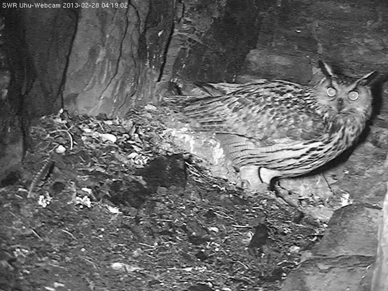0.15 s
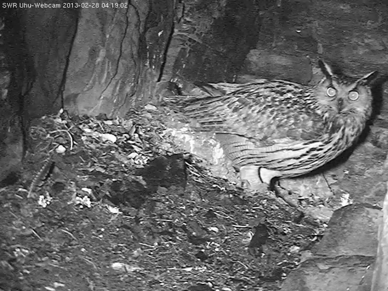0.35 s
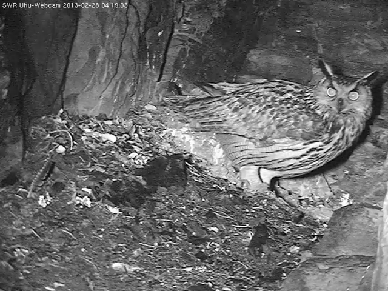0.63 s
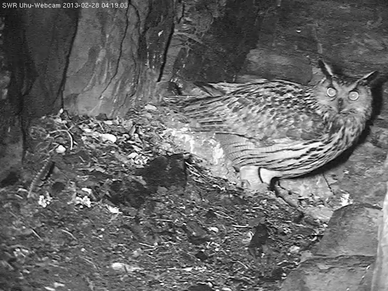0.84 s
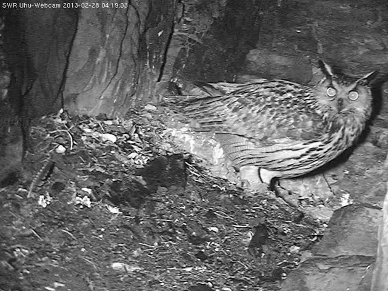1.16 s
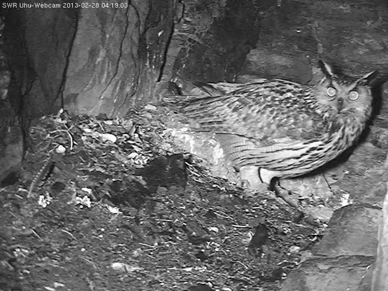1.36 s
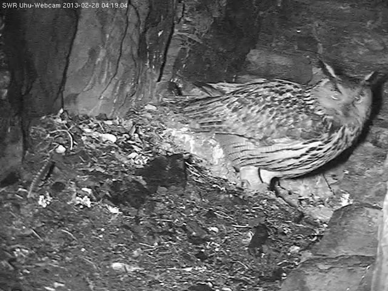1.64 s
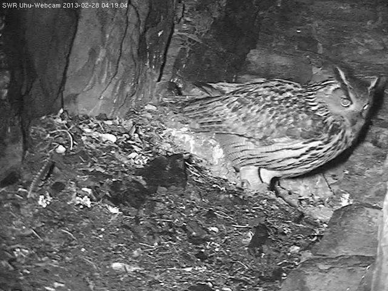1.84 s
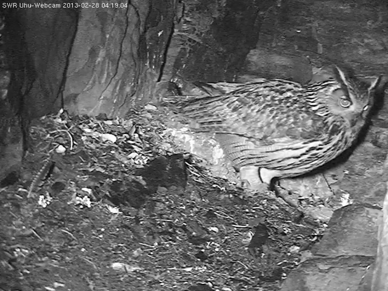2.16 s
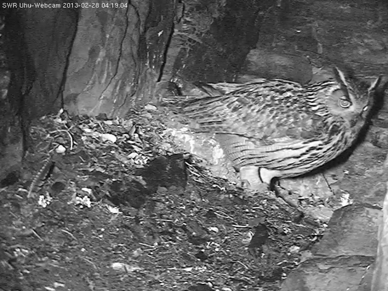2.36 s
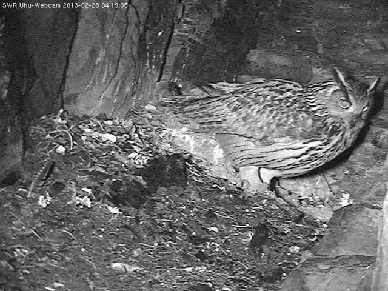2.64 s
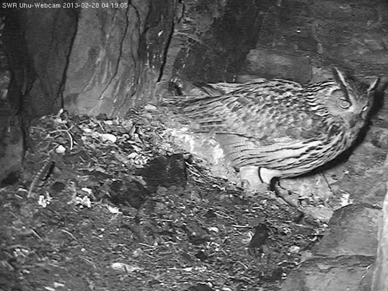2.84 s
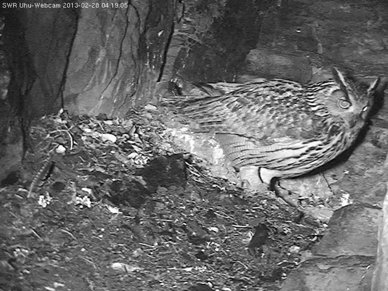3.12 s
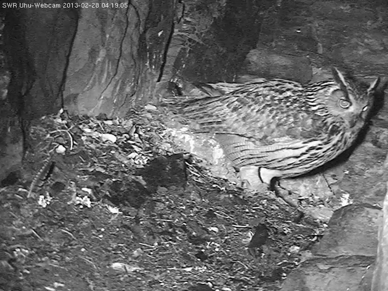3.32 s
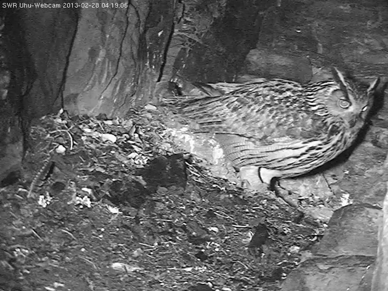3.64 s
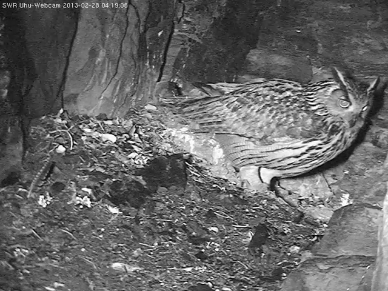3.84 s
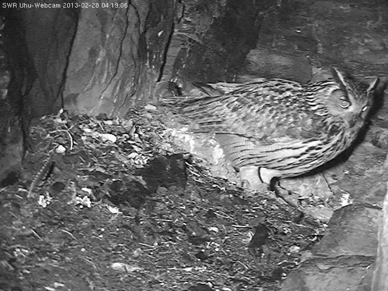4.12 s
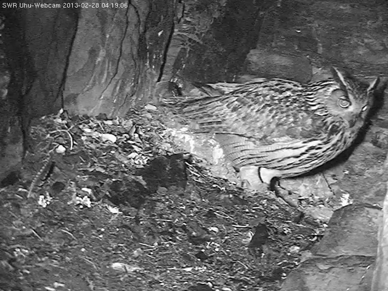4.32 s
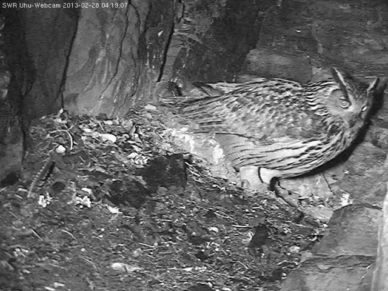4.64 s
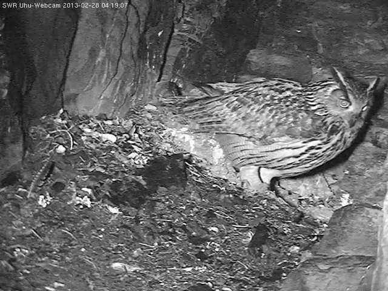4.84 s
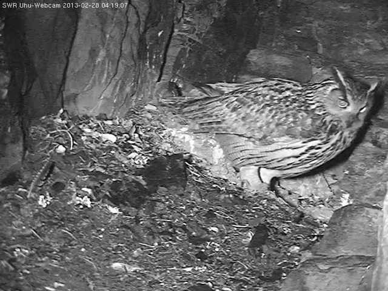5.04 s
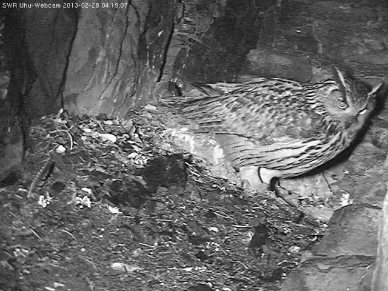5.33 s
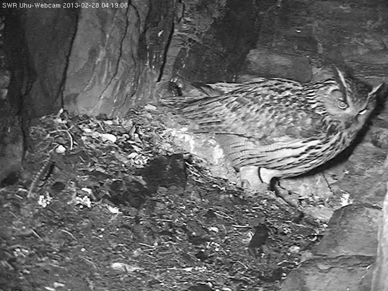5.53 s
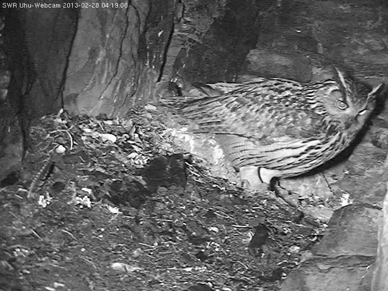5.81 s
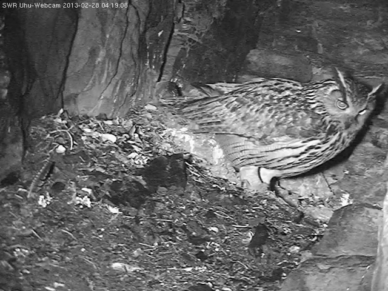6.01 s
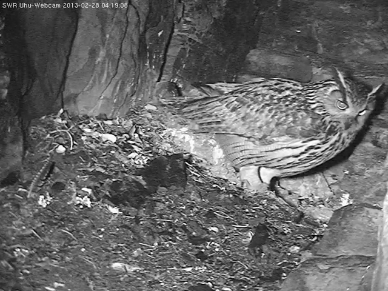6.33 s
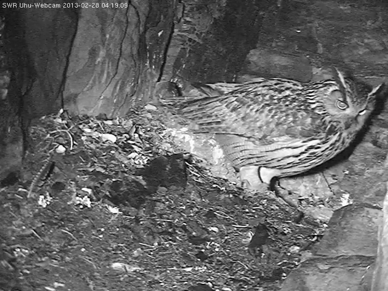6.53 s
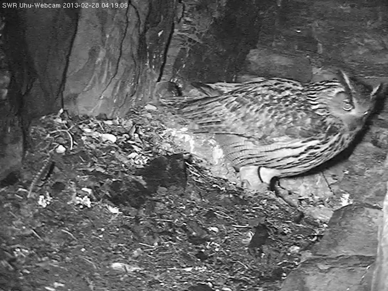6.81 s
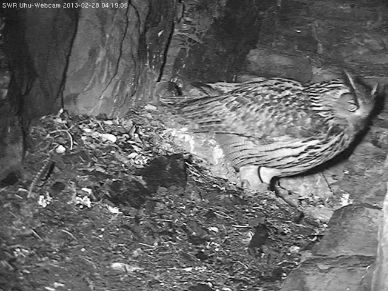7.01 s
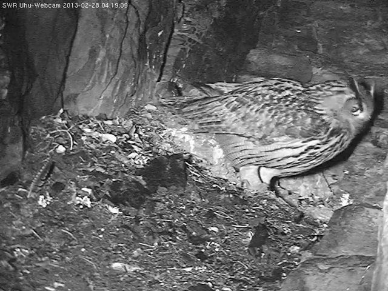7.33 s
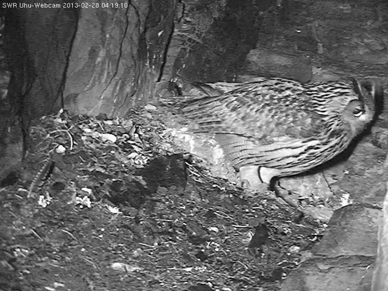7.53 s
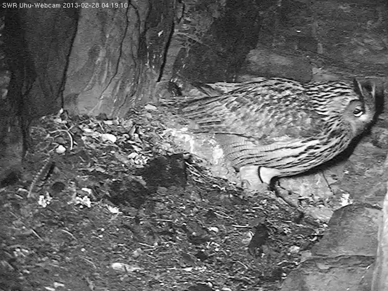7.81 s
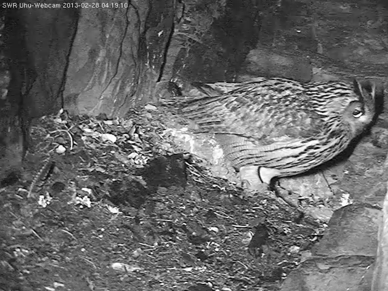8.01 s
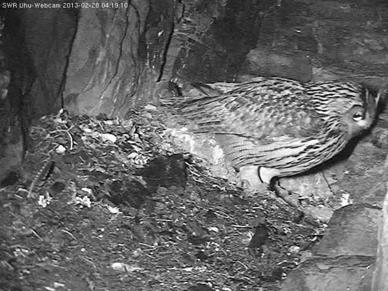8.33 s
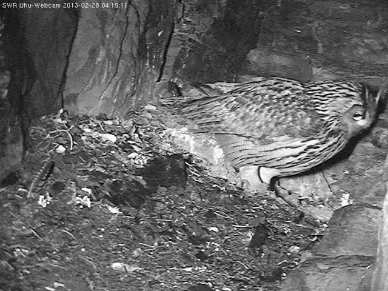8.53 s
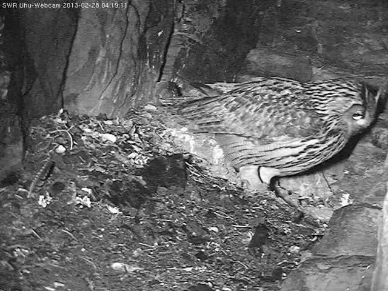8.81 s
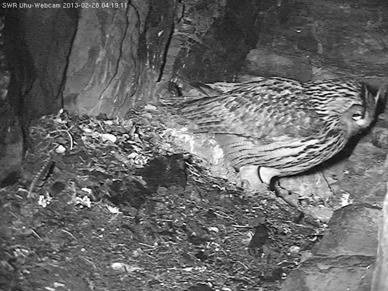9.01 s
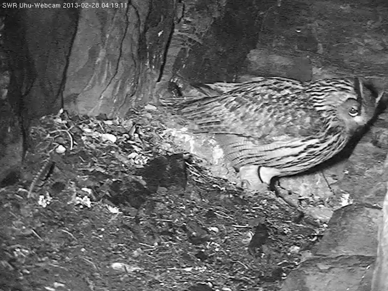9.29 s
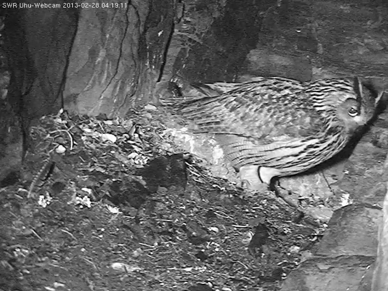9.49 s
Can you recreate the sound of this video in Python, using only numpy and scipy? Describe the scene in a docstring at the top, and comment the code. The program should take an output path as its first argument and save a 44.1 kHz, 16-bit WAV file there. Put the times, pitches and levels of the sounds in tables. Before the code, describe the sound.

An eagle owl close by gives clipped, hoarse barks twice a second, each trailed by thin whiny wheezes and low creaky grunts, over faint night hush.

```python
"""On a rock ledge at night, an eagle owl chatters close to a nest microphone.
A typical bout is a clipped bark that ends in a hiss, then a thin whine and one or two lower, creaky grunts.
The voice is a source and a filter: syrinx pulses excite throat resonances, with a faint noisy buzz on them.
Shaped noise makes the hisses, wheezes and squeaks; gliding sines make the whine, a steady sine a soft hum.
Behind them lie a faint night rush, a drone and mains hum; the rock niche adds a brief echo tail."""
import sys
import numpy as np
from scipy import signal
from scipy.fft import rfft, irfft, next_fast_len
from scipy.io import wavfile
from scipy.ndimage import uniform_filter1d, map_coordinates

SR = 44100
rng = np.random.default_rng(int(sys.argv[2]) if len(sys.argv) > 2 else 0)


def generate_wav(signal):
    """Clip the signal to [-1, 1] and save it as 16-bit WAV at the path in sys.argv[1]."""
    frames = np.transpose(np.atleast_2d(signal))
    scaled = np.clip(frames, -1, 1) * 32767
    pcm = np.round(scaled).astype(np.int16)
    wavfile.write(sys.argv[1], SR, pcm)


N = 426006

# All levels in the tables are relative: the gains set below and in scene() add to them.

# spectrum of the still night: centre_hz, gain_db
NIGHT_SPECTRUM = [(30, -2.5), (70, 5), (110, -2.5), (180, 4.5), (230, 3), (400, 7.5), (720, 2), (1100, 3.5),
                  (1500, -3), (3050, -6.5), (3600, -15), (7200, -15.5), (8500, -32)]
# narrow bands that drone in the background: centre_hz, width_hz, gain_db
DRONE_BANDS = [(148, 6.4, -5), (464, 24, -11), (980, 41, -23.5), (1835, 25, -23)]
# reverberation of the rock niche: centre_hz, t60_s
NICHE_DECAY = [(150, 0.15), (1000, 0.088), (6000, 0.017)]
# throat resonances: centre_hz, width_hz, gain_db
THROAT_MODES = [(146, 103.4, 35), (285, 160, 13), (435.6, 122, 24.3), (830, 240, 21), (1190, 850, 27.5)]
# whistling resonances of the bill: centre_hz, width_hz, gain_db
BILL_MODES = [(2300, 170, -5), (2950, 400, -10), (3470, 170, 0)]
# spectrum of air rushing through the mouth: centre_hz, gain_db
MOUTH_SPECTRUM = [(150, -22), (420, -14), (620, 0.5), (850, 4.5), (1080, 0.5), (1350, -15.5), (1800, -9),
                  (2050, -12), (2400, -7.5), (2750, -14.5), (3800, -15.5), (4400, -13), (7200, -25),
                  (8500, -46)]
# spectrum of the buzz on the pulses: centre_hz, gain_db
BUZZ_SPECTRUM = [(600, -23), (1300, -9), (1680, 0), (2000, -12), (2330, 1), (2700, -10), (3400, -11.5),
                 (3800, -17), (5200, -11), (6000, -21.5), (7400, -19), (8500, -41.5)]
# partials of the whine, in harmonic order: multiple, level_db
WHINE_PARTIALS = [(1, 1), (2, 1), (3, -17), (4, -17), (5, -24.5)]
# barks: start_s, length_s, top_pitch_hz, pulse_db, hiss_db
BARKS = [(0.6317, 0.027, 172.4, -26, -84), (1.0725, 0.0276, 252, -21, -58),
         (1.5195, 0.034, 268.6, -19.5, -50.5), (1.9289, 0.037, 272.6, -18.5, -49.5),
         (2.455, 0.0188, 211, -19, -52), (2.947, 0.031, 275, -19, -49.5), (3.4161, 0.035, 288, -19, -47),
         (3.9815, 0.026, 264.5, -18.5, -53), (4.5653, 0.029, 257.5, -18, -52),
         (5.0996, 0.038, 265, -18, -54.5), (5.6012, 0.0445, 271, -18, -50), (6.0947, 0.03, 269, -17, -51.5),
         (7.816, 0.032, 272.5, -16.5, -47.5), (8.3128, 0.04, 281.4, -17.5, -47.5),
         (8.8396, 0.033, 277, -17.5, -49), (9.375, 0.027, 253, -17, -50)]
# grunts: start_s, length_s, first_pitch_hz, last_pitch_hz, pulse_db
GRUNTS = [(0.731, .06, 178.5, 118, -27), (1.2046, .015, 168, 108.5, -27.5), (1.668, .014, 167, 110, -26.5),
          (2.0717, .021, 219, 231.5, -21), (2.132, .0653, 215.2, 105.8, -22.5),
          (3.0826, .094, 221, 119.5, -24), (3.56, .017, 205, 145, -24), (3.606, .053, 207, 107.6, -24.5),
          (4.1316, .044, 151.6, 114, -26.5), (4.6992, .011, 189, 175, -24), (5.232, .037, 198, 167, -23),
          (5.741, .02, 208.5, 162, -23.5), (5.825, .029, 166.4, 112, -23.5), (6.232, .024, 227, 211, -21),
          (6.3131, .032, 185.5, 122.4, -23), (6.835, .023, 226, 199, -21), (6.9407, 0.033, 175, 108, -23),
          (7.4453, .0184, 202, 216, -21.5), (7.5539, 0.031, 176.4, 122.6, -22),
          (7.9684, .0071, 140, 135, -29), (8.035, .041, 181, 111, -22.5),
          (8.5373, .022, 158.3, 113.8, -21.5), (8.98, 0.029, 215, 229.4, -20),
          (9.0803, .016, 138.6, 110, -23), (9.516, .007, 140, 140, -32.5), (9.6162, .0082, 122, 118, -24)]
# wheezes between the syllables, a rasp with a whine at its end: start_s, length_s, rasp_db, whine_db
WHEEZES = [(0.678, 0.037, -71, -54), (1.15, 0.058, -77, -63), (1.628, 0.025, -62.5, -62),
           (2.043, 0.034, -65, -47.5), (2.095, 0.029, -59, -46.5), (2.52, 0.063, -58.5, -52),
           (2.596, 0.047, -60.5, -54), (3.052, 0.028, -65.5, -52), (3.525, 0.033, -65, -50),
           (4.63, 0.065, -59, -52), (4.72, 0.044, -63.5, -52.5), (5.177, 0.047, -63.5, -54),
           (5.272, .05, -66.5, -56.5), (5.715, .028, -65.5, -57), (5.769, 0.041, -59, -53),
           (6.207, 0.038, -67, -60), (6.256, .05, -57, -50), (6.808, 0.028, -62, -50),
           (6.857, 0.075, -55.5, -53), (7.398, .047, -62, -49.5), (7.469, 0.076, -58.5, -50.5),
           (7.912, .053, -65.5, -47), (7.98, 0.045, -58, -48.5), (8.394, 0.06, -59.5, -49.5),
           (8.466, 0.06, -59, -50), (8.948, 0.032, -66, -47), (9.016, .048, -59, -52.5),
           (9.439, 0.068, -58, -52), (9.529, 0.067, -59.5, -50)]
# voiceless barks, a swelling squeak: start_s, length_s, level_db
SQUEALS = [(6.721, 0.031, -51), (7.325, 0.035, -51)]
# one soft hum through the closed bill: start_s, length_s, pitch_hz, level_db
MURMUR = (2.667, .016, 150, -50)

# a bark starts slack, then breaks into its high register, climbs to the top and sags
SLACK_HZ, SLACK_END_HZ, BREAK_S, BREAK_GLIDE_S = 159.7, 213, 0.0102, 0.0004
# pitch after the break and at the end (shares of the top pitch); place of the top (share of the length)
BREAK_SHARE, SAG_SHARE, TOP_AT = 0.94, 0.893, 0.72
BARK_ONSET_DB, BARK_ATTACK_S, BARK_END_DB = -7.5, 0.022, -3.5
# the hiss starts after the break and outlasts the voice
HISS_DELAY_S, HISS_OVERHANG_S, HISS_FADE_DB = 0.018, 0.027, -6.5

# the higher a grunt starts, the more its pitch bulges in the middle
ARCH_PER_HZ, ARCH_FROM_HZ = 0.003, 162
GRUNT_FIRST_DB, GRUNT_LAST_DB = -0.5, -1.5  # level at a grunt's start and end
# air under a grunt whose mean pitch is GRUNT_HZ, relative to its pulses; higher grunts leak more
GRUNT_AIR_DB, AIR_DB_PER_OCTAVE, GRUNT_HZ = -39, 13.5, 190

# the whine fills the end of a wheeze: it scoops up, then sinks
WHINE_S, SCOOP_HZ, WHINE_HZ, WHINE_END_HZ = 0.022, 372, 543, 451.5
WHEEZE_FADE_DB, SQUEAL_SWELL_DB = -3, 7  # change of level over the length
WHEEZE_DULL_HZ = 6000  # corner above which the wheezes lose treble

FLUTTER_DB, RATTLE_DB = 2.4, -2  # unevenness of the rushing air; rattle against its noise
HISS_DB, WHEEZE_DB, SQUEAL_HISS_DB, SQUEAK_DB = 16.5, 18, -1.5, 2
BUZZ_RASP, BUZZ_DB = 0.6, 52.5  # noise share of the buzz; its gain
BUZZ_REST_DB = -66  # the edge that remains without airflow
NIGHT_DB = -59.5  # rms of the rush before its slow drift
TOP_HZ = 8600  # band limit of the microphone


def amp(db):
    """Amplitude ratio of a level: twenty decibels per factor of ten."""
    return 10 ** (np.asarray(db) / 20)


def unit(x):
    """Normalisation to an rms of 1."""
    return x / np.sqrt(np.mean(x ** 2) + 1e-20)


def along(points, hz):
    """Linear interpolation of (frequency, value) points on a logarithmic frequency axis."""
    f, v = np.transpose(points)
    return np.interp(np.log(hz + 1), np.log(f + 1), v)


def wobble(rate):
    """Slow random modulation: a smooth curve through rate random knots a second."""
    knots = rng.standard_normal(int(N * rate / SR) + 4)
    return map_coordinates(knots, [np.arange(N) * rate / SR])


def filtered(x, response):
    """Linear filtering: the spectrum of x times a response of frequency."""
    m = next_fast_len(N + SR // 2)
    return irfft(rfft(x, m) * response(np.fft.rfftfreq(m, 1 / SR)), m)[:N]


def resonances(modes, f):
    """Superposition of damped resonators, each a causal (centre, width, gain) band-pass."""
    return sum(amp(db) * 1j * f * w / (hz * hz - f * f + 1j * f * w) for hz, w, db in modes)


def gate(t, start, end, edge):
    """Amplitude window that opens at start and shuts at end, softly over edge seconds."""
    return (np.tanh((t - start) / edge) - np.tanh((t - end) / edge)) / 2


def add(out, times, sizes):
    """Band-limited impulses: windowed sincs place pulses between the samples."""
    taps = (times * SR).astype(int)[:, None] + np.arange(-8, 9)
    shape = np.sinc(taps - times[:, None] * SR) * np.hanning(taps.shape[1])
    np.add.at(out, np.clip(taps, 0, N - 1), sizes[:, None] * shape)


def airflow(rows, fade_db, edge):
    """Flow envelope: (start, length, dB) puffs whose level slides by fade_db over their length."""
    gain = np.zeros(N)
    for start, length, db in rows:
        first = max(int(start * SR) - SR // 20, 0)
        last = min(int((start + length) * SR) + SR // 20, N)
        i = np.arange(first, last)
        slide = fade_db * (np.clip((i / SR - start) / length, 0, 1) - 0.5)
        gain[i] += amp(db + slide) * gate(i / SR, start, start + length, edge)
    return gain


def night(drone_db, hum_db):
    """Stationary background: a nearly even shaped-noise rush, noise in narrow bands and a mains sine."""
    rush = unit(filtered(rng.standard_normal(N), lambda f: amp(along(NIGHT_SPECTRUM, f))))
    drone = unit(filtered(rng.standard_normal(N), lambda f: resonances(DRONE_BANDS, f)))
    hum = unit(np.sin(2 * np.pi * 50 * np.arange(N) / SR))
    return amp(NIGHT_DB + 0.16 * wobble(3.4)) * rush + amp(drone_db) * drone + amp(hum_db) * hum


def niche(x):
    """Reverberation: decaying noise stands for the rock walls' echoes, the treble dying first."""
    hz, t, z = signal.stft(rng.standard_normal(SR // 3), SR, nperseg=256)
    decay = amp(-60 * t / along(NICHE_DECAY, hz)[:, None])
    tail = signal.istft(z * decay, SR, nperseg=256)[1]
    return signal.fftconvolve(x, tail / np.linalg.norm(tail))[:N]


def murmur():
    """Low-pass radiation: a grunt behind the closed bill lets out only its fundamental, a sine."""
    s, length, hz, db = MURMUR
    t = np.arange(N) / SR
    return amp(db) * gate(t, s, s + length, edge=0.0035) * np.sin(2 * np.pi * hz * (t - s))


def rattle(rate_hz, uneven, scatter_db):
    """Irregular flapping: membranes that do not quite close make sharp ticks of scattered size."""
    gaps, sizes = rng.standard_normal((6000, 2)).T
    ticks = np.zeros(N)
    times = np.cumsum(np.exp(uneven * gaps) / rate_hz)
    inside = times < N / SR
    add(ticks, times[inside], amp(scatter_db * np.clip(sizes[inside], -2, 2)))
    return ticks


def squeak(ticks, rattle_db):
    """Resonance driven by noise: a hard push of voiceless air rattles and whistles in the bill."""
    drive = rng.standard_normal(N) + amp(rattle_db) * unit(ticks)
    whistle = filtered(drive, lambda f: resonances(BILL_MODES, f) * amp(along(MOUTH_SPECTRUM, f)) ** 0.5)
    return airflow(SQUEALS, fade_db=SQUEAL_SWELL_DB, edge=0.0048) * unit(whistle)


def whine(waver, flutter_db, scoop_s, lead_db, level_db):
    """Weak oscillation: tense membranes scoop up to a thin, unsteady harmonic tone that sinks in pitch."""
    out = np.zeros(N)
    drift = 1 + waver * wobble(160)
    flutter = amp(flutter_db * wobble(120))
    for s, length, _, db in WHEEZES:
        end = s + length
        start = end - WHINE_S
        i = np.arange(int(s * SR) - SR // 25, min(int(end * SR) + SR // 50, N))
        t = i / SR
        pitch = np.interp(t, [start - scoop_s, start, end], [SCOOP_HZ, WHINE_HZ, WHINE_END_HZ])
        phase = 2 * np.pi * np.cumsum(pitch * drift[i]) / SR
        tone = sum(amp(level) * np.sin(multiple * phase) for multiple, level in WHINE_PARTIALS)
        # before the whine proper only the octave speaks
        lead_in = amp(lead_db) * gate(t, s, start, edge=0.004) * np.sin(2 * phase)
        out[i] += amp(db + level_db) * (gate(t, start, end, edge=0.0033) * tone + lead_in)
    return out * flutter


def air():
    """Airflow through the open bill, which leaks most: under barks and grunts, in wheezes, in squeals."""
    barks = [(s + HISS_DELAY_S, length + HISS_OVERHANG_S - HISS_DELAY_S, hiss_db)
             for s, length, _, _, hiss_db in BARKS]
    grunts = []
    for s, length, first, last, db in GRUNTS:
        octaves = np.log2((first + last) / 2 / GRUNT_HZ)
        grunts.append((s, length, db + GRUNT_AIR_DB + AIR_DB_PER_OCTAVE * octaves))
    wheezes = [(s, length, db) for s, length, db, _ in WHEEZES]
    voiced = airflow(barks, fade_db=HISS_FADE_DB, edge=0.005) + airflow(grunts, fade_db=-5.5, edge=0.003)
    wheezing = airflow(wheezes, fade_db=WHEEZE_FADE_DB, edge=0.007)
    squealing = amp(SQUEAL_HISS_DB) * airflow(SQUEALS, fade_db=1.5, edge=0.0044)
    return voiced, wheezing, squealing


def hiss(flow, ticks, level_db):
    """Turbulence: air rushes unevenly through the mouth, with the rattle on it."""
    rush = rng.standard_normal(N) * amp(FLUTTER_DB * wobble(170)) + amp(RATTLE_DB) * unit(ticks)
    return amp(level_db) * filtered(flow * rush, lambda f: amp(along(MOUTH_SPECTRUM, f)))


def bark(u, length, top_hz, db):
    """Register break: pitch and level over u (0 to 1), about two slack beats, then a jump to tense ones."""
    t = u * length
    slack = np.interp(t, [0, BREAK_S], [SLACK_HZ, SLACK_END_HZ])
    tense = top_hz * np.interp(u, [0, TOP_AT, 1], [BREAK_SHARE, 1, SAG_SHARE])
    pitch = slack + (tense - slack) * (1 + np.tanh((t - BREAK_S) / BREAK_GLIDE_S)) / 2
    attack = np.interp(t, [0, BARK_ATTACK_S], [BARK_ONSET_DB, 0])
    release = np.interp(u, [0.7, 1], [0, BARK_END_DB])
    return pitch, db + attack + release


def grunt(u, first_hz, last_hz, db):
    """Tension glide: pitch and level over u, arching when it starts high, loudest near the middle."""
    arch = ARCH_PER_HZ * max(first_hz - ARCH_FROM_HZ, 0)
    pitch = (first_hz + (last_hz - first_hz) * u) * (1 + arch * np.sin(np.pi * u))
    return pitch, db + np.interp(u, [0, 0.4, 1], [GRUNT_FIRST_DB, 1, GRUNT_LAST_DB])


def syrinx(jitter_s, scatter_db, opening, lead_s, tense_hz, level_db):
    """Pulsed excitation: one pulse per membrane closure, and the puff of the opening just before it."""
    closures, openings = np.zeros(N), np.zeros(N)
    u = np.linspace(0, 1, 200)
    syllables = [(s, length, *bark(u, length, hz, db)) for s, length, hz, db, _ in BARKS]
    syllables += [(s, length, *grunt(u, first, last, db)) for s, length, first, last, db in GRUNTS]
    for s, length, pitch, db in syllables:
        # one closure each time the integrated pitch completes a cycle
        cycles = (np.cumsum(pitch) - pitch[0]) * length / len(u)
        beats = np.linspace(0, cycles[-1], round(cycles[-1]) + 1)
        when = np.interp(beats, cycles, u)
        # slack membranes beat slowly and unevenly; tense ones burst open harder
        slack = 1 / (1 + (np.interp(when, u, pitch) / tense_hz) ** 10)
        early, strong = rng.standard_normal((2, 32))[:, :len(when)]
        size = amp(level_db + np.interp(when, u, db) + scatter_db * slack * strong)
        at = s + when * length + jitter_s * slack * early
        add(closures, at, size)
        add(openings, at - lead_s, size * opening * (1.3 - slack))
    return closures, openings


def beating(pulses):
    """Short-time mean of the pulses: near 1 while the syrinx beats hard, 0 at rest."""
    voiced = np.abs(uniform_filter1d(pulses, size=320))
    return voiced / voiced.max()


def buzz(pulses, flow):
    """Modulated turbulence: closures keep a sharp edge that grows with airflow, each with a spit of noise."""
    spit = uniform_filter1d(pulses, size=48) * rng.standard_normal(N)
    edge = (flow + amp(BUZZ_REST_DB)) * (pulses + BUZZ_RASP * spit)
    return amp(BUZZ_DB) * filtered(edge, lambda f: amp(along(BUZZ_SPECTRUM, f)))


def voice(flow, soft_hz, low_hz, dip_hz, dip_width_hz):
    """Source and filter: softened pulses ring in the throat, and a side cavity cuts a notch at dip_hz."""
    def throat(f):
        soft = signal.freqs(*signal.butter(8, soft_hz, analog=True), f)[1]
        dip = np.abs(1 - resonances([(dip_hz, dip_width_hz, 0)], f))
        bass_cut = f ** 4 / (f ** 4 + low_hz ** 4)
        return soft * dip * resonances(THROAT_MODES, f) * bass_cut
    return filtered(flow, throat)


def scene():
    """Superposition: the owl, its echo in the niche and the night's background."""
    closures, openings = syrinx(jitter_s=0.00004, scatter_db=2.16, opening=0.47, lead_s=0.00078,
                                tense_hz=230, level_db=1.5)
    voiced, wheezing, squealing = air()
    ticks = rattle(rate_hz=300, uneven=0.3, scatter_db=3)
    free = 1 / (1 + 6 * beating(closures))  # the beating syrinx holds the air back
    owl = voice(openings - closures, soft_hz=1008, low_hz=92.0, dip_hz=1350, dip_width_hz=300)
    owl = owl + buzz(closures, voiced)
    owl = owl + hiss(free * (voiced + squealing), ticks, HISS_DB)
    wheeze = hiss(free * wheezing, ticks, WHEEZE_DB)
    owl = owl + filtered(wheeze, lambda f: 1 / (1 + 1j * f / WHEEZE_DULL_HZ))
    owl = owl + amp(SQUEAK_DB) * squeak(ticks, rattle_db=3) + murmur()
    owl = owl + whine(waver=0.03, flutter_db=4.5, scoop_s=0.0162, lead_db=-10, level_db=1.5)
    echo = amp(-21) * niche(owl)
    return (owl + echo + night(drone_db=-63, hum_db=-77))[None]


def record(dry):
    """Band limitation: the nest microphone passes nothing above TOP_HZ."""
    return filtered(dry[0], lambda f: f < TOP_HZ)[None]


dry = scene()
out = record(dry)
generate_wav(out)
```